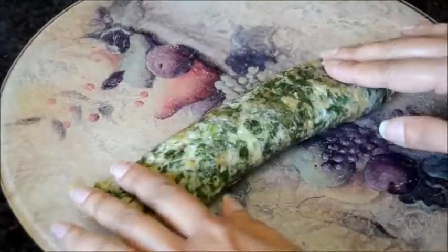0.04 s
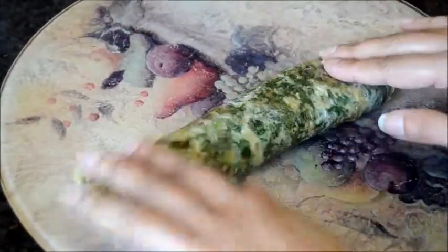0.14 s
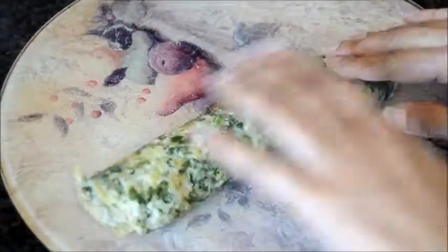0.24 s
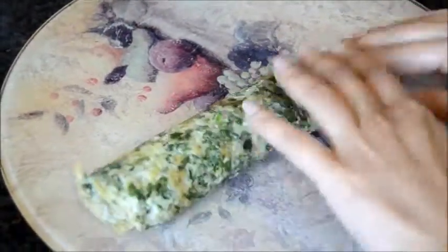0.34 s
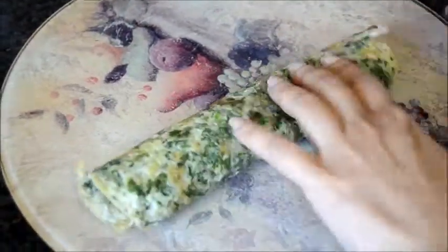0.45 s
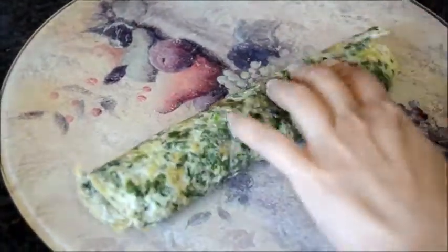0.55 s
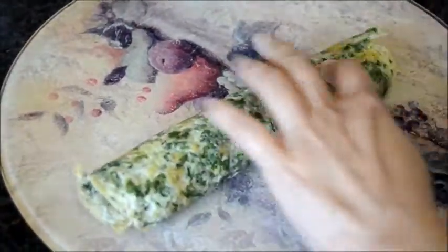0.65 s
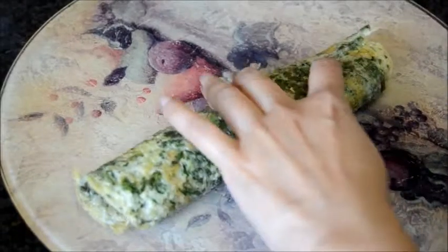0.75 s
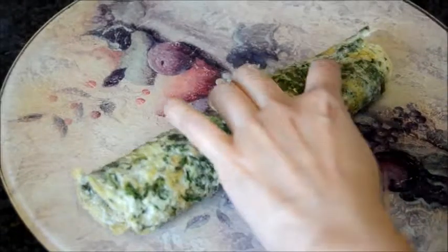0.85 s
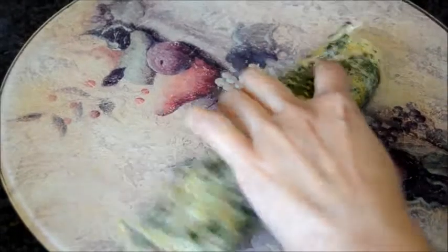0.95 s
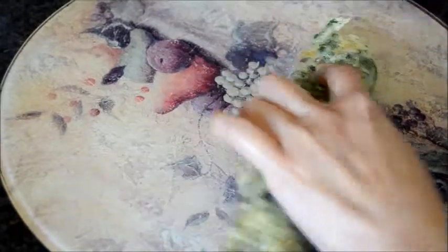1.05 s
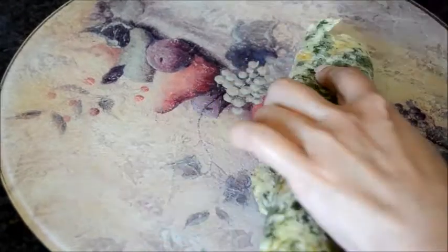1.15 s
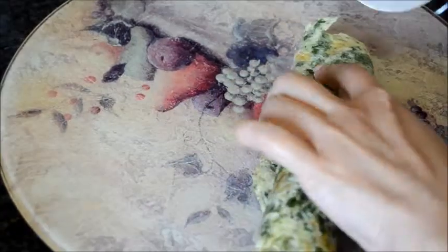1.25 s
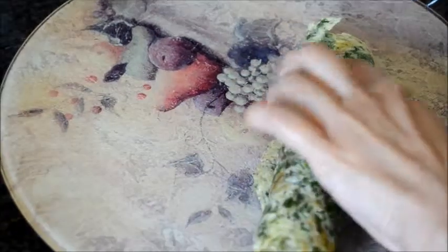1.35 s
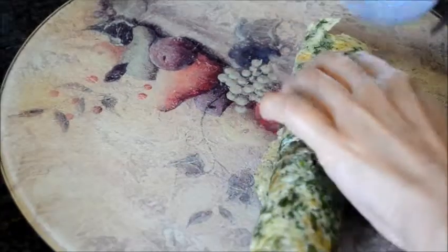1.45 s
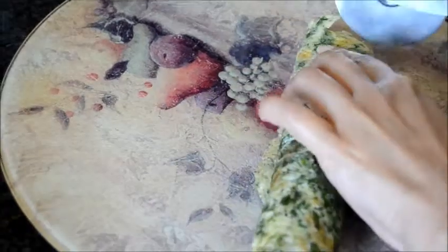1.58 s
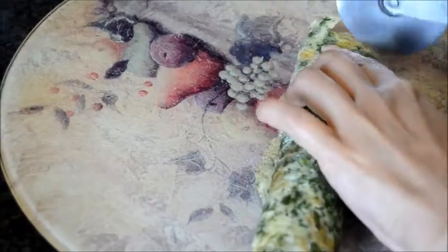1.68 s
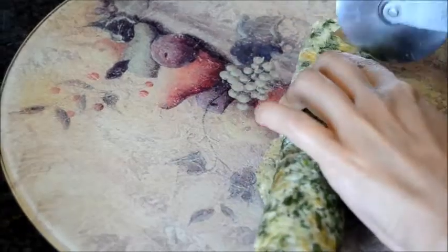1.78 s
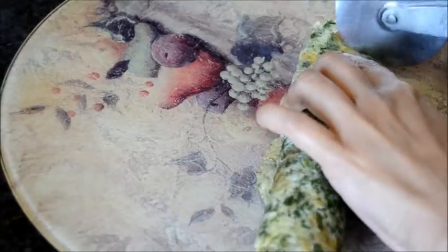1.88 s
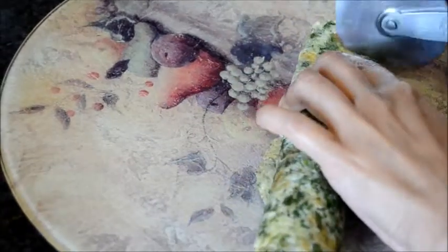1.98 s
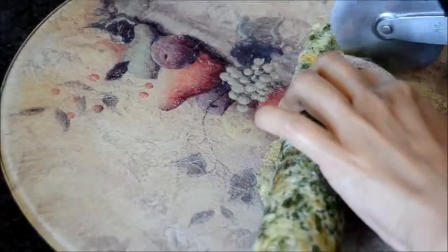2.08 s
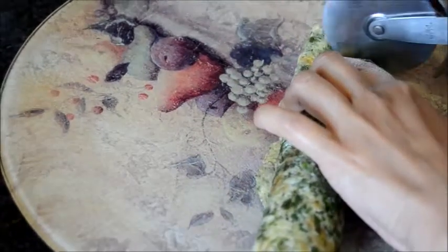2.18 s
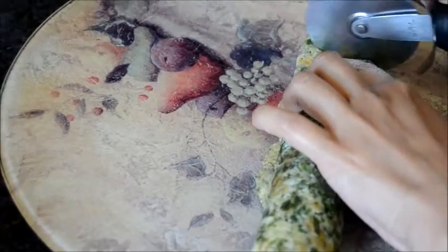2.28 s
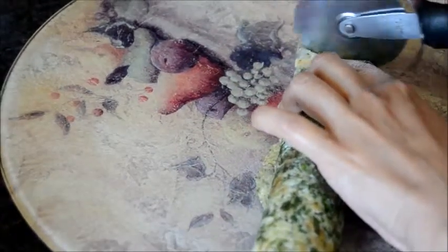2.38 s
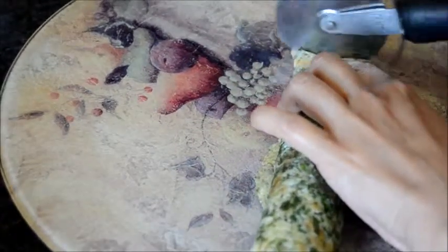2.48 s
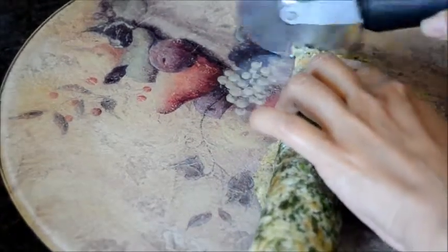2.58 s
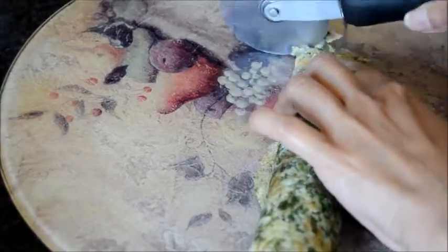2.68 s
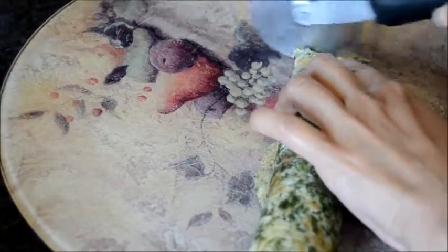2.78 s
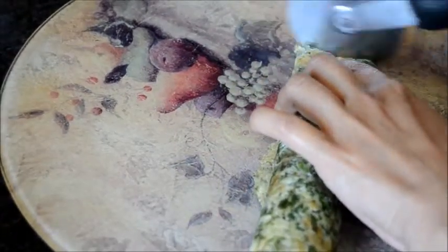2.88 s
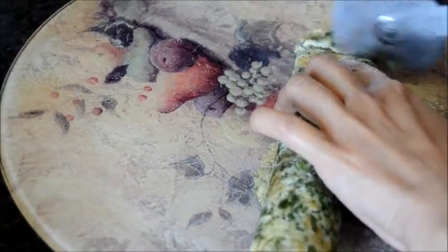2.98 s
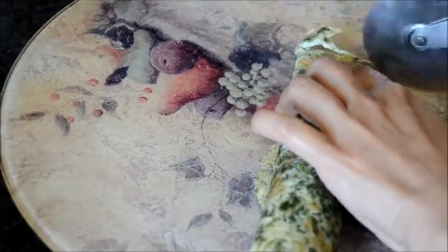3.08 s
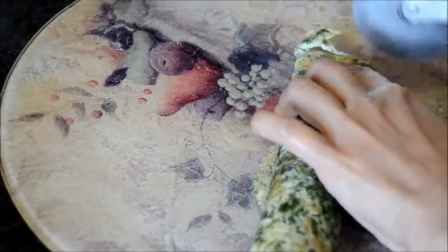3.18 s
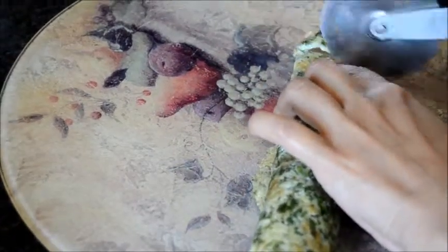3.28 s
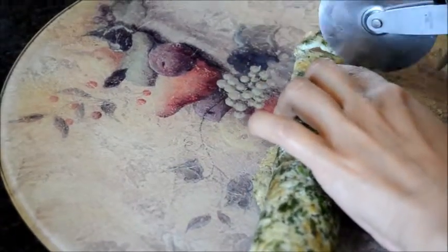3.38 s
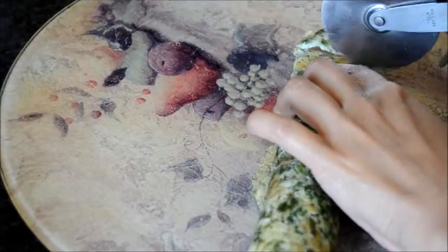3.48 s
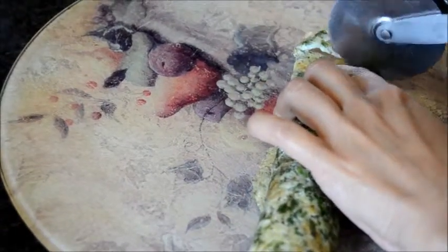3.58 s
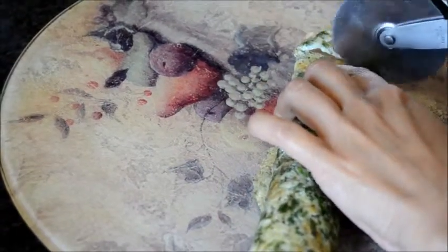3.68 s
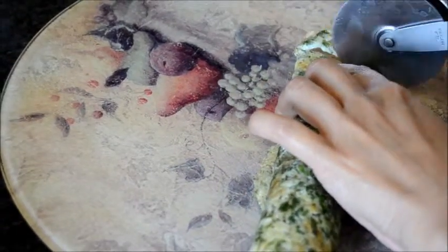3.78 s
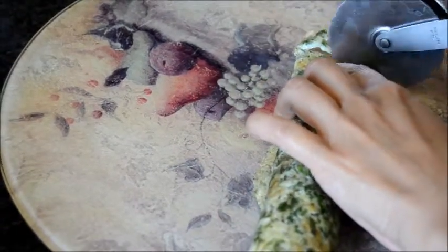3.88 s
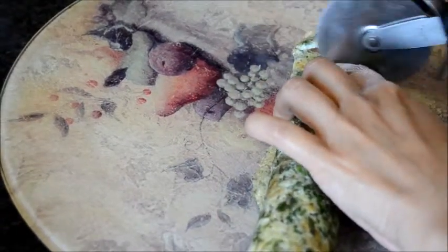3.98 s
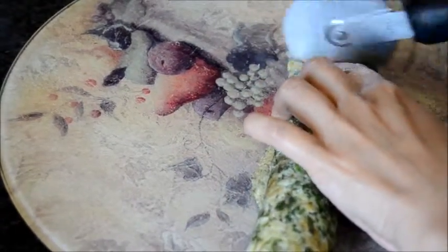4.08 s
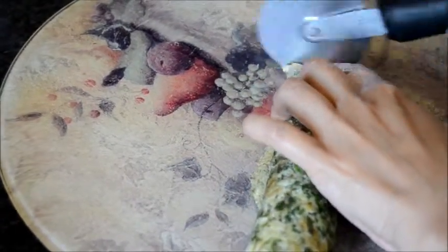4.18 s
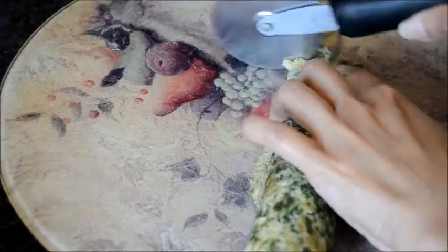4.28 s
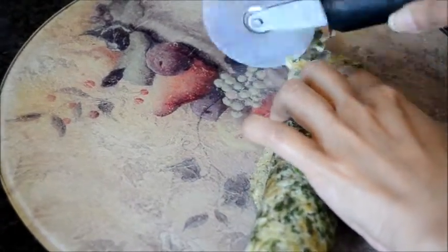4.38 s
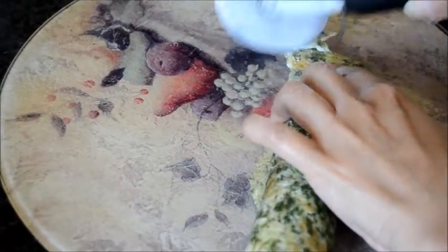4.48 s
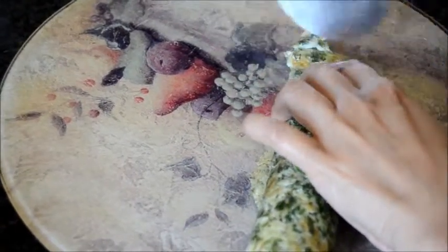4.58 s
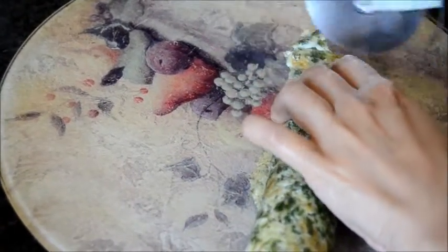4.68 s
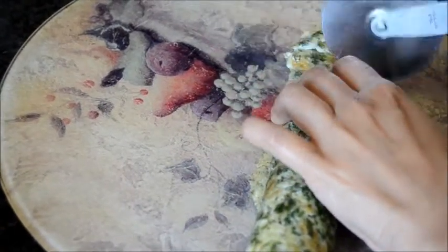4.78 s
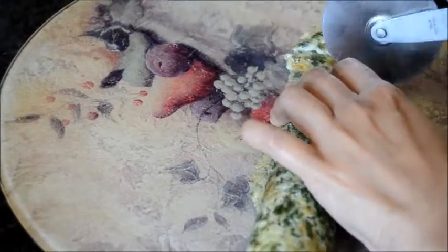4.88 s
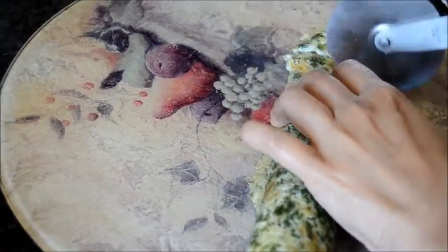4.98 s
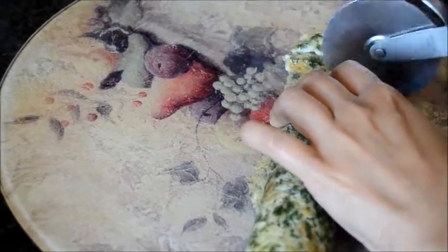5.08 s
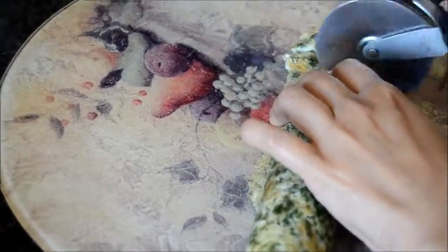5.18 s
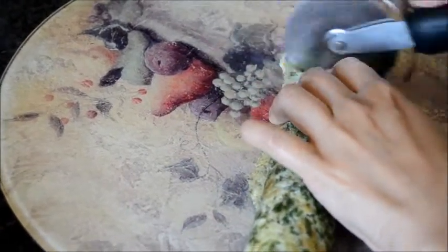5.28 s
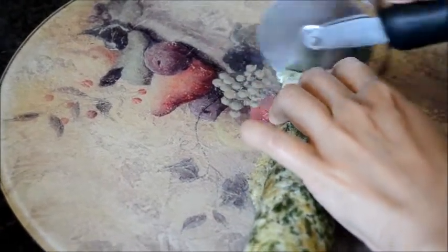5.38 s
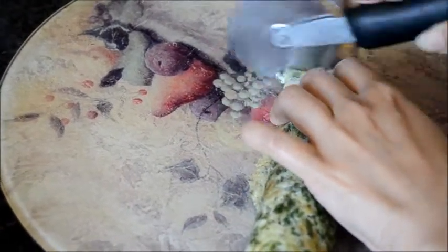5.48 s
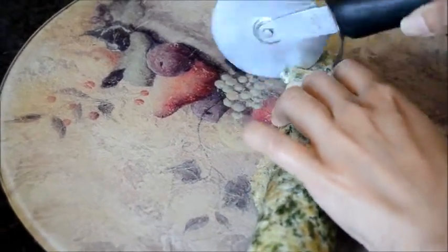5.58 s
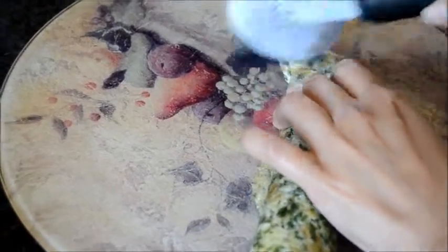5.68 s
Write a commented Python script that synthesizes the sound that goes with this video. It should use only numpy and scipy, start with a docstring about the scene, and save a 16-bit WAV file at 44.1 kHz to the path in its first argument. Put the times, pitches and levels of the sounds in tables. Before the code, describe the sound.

Moist egg crackles faintly, a metal pizza cutter clatters as it is picked up, then three strokes scrape and knock on a hard board.

```python
"""Moist egg crackles softly over a low steady hum of air, then a steel pizza wheel is picked up with a clatter.
It is pushed three times through a rolled omelette: bursts of tiny slips and single blows ring the hard board.
The free wheel rings in slowly beating pairs of partials, and the egg is random fizz with small smacks.
A small, bright kitchen, a dense decaying tail, answers all but the wheel's ring and the hum.
The board is close to the microphone, the pickup further off."""
import sys
import numpy as np
from scipy import signal
from scipy.fft import rfft, irfft, next_fast_len
from scipy.io import wavfile
from scipy.ndimage import uniform_filter1d

SR = 44100
rng = np.random.default_rng(int(sys.argv[2]) if len(sys.argv) > 2 else 0)


def master(y):
    """Save y as 16-bit WAV."""
    cut = np.clip(np.atleast_2d(y).T, -1, 1)
    pcm = np.round(cut * 32767)  # scale
    wavfile.write(sys.argv[1], SR, pcm.astype(np.int16))


N = 253479  # length in samples

# Small things radiate little bass. Each row: frequency in Hz, gain in dB.
RADIATION = [(30, -29.5), (100, -15.5), (240, -2.5)]


def grinding(ring_db=1.5, rasp_db=-3.5, clack_db=-2, damped_share=0.19, gain_db=-3, shift_db=6,
             bump_db=-9, spots=4):
    """The rim crushes its way over the board's texture: dense slips and a few bumps keep its modes ringing."""
    # Pushes of the wheel along the board. Each row: start in seconds, end in seconds,
    # relative force at the end in dB, swell up to it in dB (negative sags).
    pushes = [(2.383, 2.577, -53, 2), (2.599, 2.664, -39.5, 7), (2.843, 2.999, -31.5, 5),
              (3.027, 3.077, -39.5, 0), (3.995, 4.181, -54, 4), (4.2, 4.287, -45, -2.5),
              (5.18, 5.178, -46.5, -1), (5.29, 5.542, -45.5, 4.5)]
    # Colour of the rasp at the rim. Each row: frequency in Hz, gain in dB.
    rasp_colour = [(59, -71), (100, -29), (273, -18), (635, -10.5), (941, -3), (1040, -10.5), (1340, 6),
                   (1630, -13.5), (2190, 1.5), (3520, -12.5), (5110, -12), (5640, -23), (6340, -13.5),
                   (8690, -37.5), (11000, -52), (14300, -90), (22000, -120)]
    t = np.arange(SR // 3) / SR
    force = np.zeros(N)
    for start, end, db, swell_db in pushes:
        force += undb(db) * gesture(start, end, attack_s=0.016, release_s=0.026, swell_db=swell_db)
    slips = grains(rate=1150, spread_db=3.0)
    bumps = undb(bump_db) * grains(rate=70, spread_db=1.0)
    excitation = (slips + bumps) * force

    # the contact travels over spots that each ring the board a little differently
    shares = np.array([undb(shift_db * walk(rate=40)) for _ in range(spots)])
    shares /= np.linalg.norm(shares, axis=0)
    rasp = undb(rasp_db) * energy_one(colour(signal.unit_impulse(len(t)), rasp_colour))
    middle = board_at(0)
    out = np.zeros(N)
    for share in shares:
        clack = undb(clack_db) * ring(middle * [1, 1, damped_share], t, scatter_db=7.0)
        body = rasp + clack + undb(ring_db) * ring(middle, t, scatter_db=3.0)
        out += signal.fftconvolve(excitation * share, body)[:N]
    return undb(gain_db) * colour(out, RADIATION)


def knocks():
    """The rim drops into dents and bangs down as it leaves the omelette, each blow ringing the board."""
    # Each row: time in seconds, peak of the direct sound in dB, treble slope in dB per octave,
    # place on the board from 0 (middle) to 1 (edge).
    blows = [(2.552, -37, -7, 0.23), (2.582, -33, -0.5, 0.39), (2.593, -36, -3, 0.14),
             (2.629, -27.5, -0.4, 0.28), (2.690, -31.5, 0.5, 0.23), (2.778, -40.5, 1, .2),
             (2.803, -37, -0.5, 0.23), (2.813, -32, 0, 0.27), (2.827, -34, -0.5, 0.24),
             (2.846, -28.5, 2, 0.33), (2.873, -27, 0.5, 0.17), (2.8799, -27, 2, .22), (2.901, -27, 0.5, .1),
             (2.987, -31, 5, .1), (3.037, -28, -0.5, 0.083), (3.051, -29.5, 1.5, .1),
             (3.164, -30.5, -2, 0.38), (3.1671, -22.5, -3.5, 0.42), (4.068, -45.5, -0.5, .3),
             (4.155, -42, 0, 0.24), (4.174, -43, -4, .3), (4.252, -41, -8, .3), (4.266, -38, -5, .4),
             (4.293, -25.5, 4, .74), (4.2973, -14.5, 2.7, .83), (4.308, -19.5, 1.5, 0.9),
             (4.326, -27, 4.5, 0.76), (4.347, -33, 3, .95), (4.476, -37.5, -0.3, 1),
             (5.176, -50.5, -4.5, 0.35), (5.285, -40.5, -4, 0.17), (5.448, -38.5, -7, 0.41),
             (5.529, -42, -9, .23), (5.561, -37.5, -2.5, 0.56), (5.582, -40.5, 3.5, 1), (5.586, -35, -6, 1),
             (5.67, -51, -9, .3), (5.68, -40, -6, .25)]
    # Colour of the snap. Each row: frequency in Hz, gain in dB.
    snap_colour = [(30, -27), (120, -41.5), (300, -30), (600, -19.5), (1000, -5), (1400, 4.5), (2200, 5.5),
                   (3200, -5.5), (4300, -3), (5700, -26.5), (6800, -17), (7800, -25), (8600, -23),
                   (11000, -64.5)]
    out = np.zeros(N)
    for s, db, slope_db, place in blows:
        knock = blow(snap_colour, board_at(place), slope_db, ring_db=-1, crack_t60=0.016, chatter_db=5.5)
        add(out, s, knock, db)
    return out


def omelette(patchy_db=3.5, board_db=-3, snap_db=-9, resting_db=-75.5):
    """Moist egg fizzes in fits under pressure and lets go with small smacks."""
    # Egg squeezed by fingers or blade. Each row: start in seconds, end in seconds,
    # fizz level in dB before the loss of bass.
    squeezes = [(0.027, 0.193, -68), (0.425, 0.454, -69), (.56, .68, -68), (0.746, 1.108, -59.5),
                (1.255, 1.945, -65.5), (2.04, 2.157, -70), (2.297, 2.568, -62), (3.69, 3.913, -73.5),
                (4.012, 4.302, -58.5), (4.756, 4.788, -64.5), (4.977, 5.112, -64.5), (5.138, 5.592, -60.5)]
    # Egg sticking and letting go. Each row: time in seconds, peak in dB before the loss of bass,
    # centre frequency in Hz, t60 of the noise in seconds.
    smacks = [(.408, -57, 8500, 0.15), (1.2543, -47.5, 3520, 0.062), (1.293, -52, 4140, 0.06),
              (1.358, -54.5, 4800, .05), (2.059, -57.5, 8100, .05), (2.14, -54, 3900, .056),
              (2.367, -45.5, 6000, 0.31), (3.396, -59.5, 8000, .042), (3.629, -46, 4040, 0.08),
              (4.753, -53.5, 5000, .25), (5.357, -42, 4930, 0.096)]
    # Colour of the moist egg. Each row: frequency in Hz, gain in dB.
    egg_colour = [(300, 3.5), (1500, 3.5), (3000, -3.5), (4500, 1.5), (6400, 1), (7800, -6), (9000, 0.5),
                  (11000, -16.5)]
    fizz = grains(rate=1800, spread_db=2.5) * undb(patchy_db * walk(rate=40))
    pressure = np.full(N, undb(resting_db))  # egg under the resting hand
    for start, end, db in squeezes:
        pressure += undb(db) * gesture(start, end, attack_s=0.023, release_s=0.04)
    out = unit(colour(fizz, egg_colour)) * pressure

    t = np.arange(SR // 5) / SR
    # only a firm squeeze reaches through to the board
    firm = out * pressure / pressure.max()
    out += undb(board_db) * signal.fftconvolve(firm, ring(board_at(0), t, scatter_db=3.0))[:N]
    for s, db, hz, t60 in smacks:
        smack = energy_one(rng.standard_normal(len(t)) * fade(t, t60))
        smack += undb(snap_db) * signal.unit_impulse(len(t))
        add(out, s, band(colour(smack, egg_colour), hz, skirt_db=-19.5), db)
    return colour(out, RADIATION)


def pickup():
    """Loose steel parts, wheel, fork and guard, clash as the cutter is taken up."""
    # Each row: time in seconds, peak of the direct sound in dB, treble slope in dB per octave,
    # free ring against the snap in dB.
    clashes = [(.814, -49.5, 0.5, -26), (.824, -50, -17, -19), (.8665, -33, -1.5, -6),
               (.8745, -29.5, 1.5, -4.5), (.878, -30.5, -0.5, 0), (.886, -36, -0.5, -10),
               (.92, -37.5, 0, -4)]
    # Colour of the snap. Each row: frequency in Hz, gain in dB.
    snap_colour = [(88, -51), (150, -26), (292, -18), (449, -24), (770, -5), (1300, -12), (1860, 0.5),
                   (2300, -9), (3300, -2.5), (4990, -2), (5560, -10), (6300, 0), (7680, -9.5), (9030, 0.5),
                   (11000, -29), (14300, -59), (22000, -120)]
    # Modes of fork and guard. Each row: frequency in Hz, relative level in dB, t60 in seconds.
    fork = [(2066, -8, 0.078), (2700, -8, 0.072), (2810, -3.5, .1), (3290, -5, 0.099), (4480, -6, 0.16),
            (4790, -4, 0.097), (5179, -5, 0.33), (6200, -9, 0.2), (6380, -4.5, 0.16), (7110, -3, 0.45),
            (9000, -24, 0.23), (9400, -15, 0.071), (9200, 3.5, 0.21)]
    out = np.zeros(N)
    for s, db, slope_db, ring_db in clashes:
        clash = blow(snap_colour, fork, slope_db, ring_db, crack_t60=0.068, chatter_db=11)
        add(out, s, clash, db)
    return out


def wheel(twin_db=-6):
    """Clear of the board the thin disc sings on until it is damped; its modes come in beating pairs."""
    # Modes of the free disc. Each row: frequency in Hz, relative level in dB, t60 in seconds, beat in Hz.
    disc = [(2416, -2, 2, 2.2), (3875, -11, 2.6, 3), (5575, -11, 2.6, 3.4), (6985, -1, 1.05, 4.6),
            (7546, -3, 2.6, 1.9), (9215, 1, 1.1, 3.1), (9766, -3, 1.45, 4.2)]
    # The wheel is set free. Each row: time in seconds, peak in dB, seconds until it is silenced.
    lifts = [(.877, -51.5, 1.5), (3.166, -68.5, .42), (5.681, -64, .3)]
    out = np.zeros(N)
    t = np.arange(2 * SR) / SR
    pairs = []
    for hz, db, t60, beat in disc:
        pairs += [(hz, db, t60), (hz + beat, db + twin_db, t60)]
    for s, db, length in lifts:
        damping = np.clip((length - t) / .1, 0, 1)  # falls to nothing over the last 0.1 s
        add(out, s, ring(pairs, t, scatter_db=1) * damping, db)
    return out


def nudges():
    """Things nudged along the board: brief soft rubs, each noise in one broad band."""
    # Each row: middle in seconds, peak of the direct sound in dB, half length (to 1/e) in seconds,
    # centre frequency in Hz.
    rubs = [(0.767, -57, 0.017, 1640), (0.826, -45, 0.015, 3520), (0.843, -54, 0.04, 324),
            (1.791, -60.5, 0.038, 1580), (1.939, -61.5, 0.017, 2150), (2.298, -58, .012, 2170),
            (3.784, -59, 0.034, 1470), (4.789, -58, 0.049, 1340)]
    out = np.zeros(N)
    t = np.arange(-SR // 8, SR // 8) / SR
    for s, db, half, hz in rubs:
        rub = band(rng.standard_normal(len(t)), hz, skirt_db=-43.0) * np.exp(-(t / half) ** 2)
        add(out, s + t[0], rub, db)
    return out


def kitchen(x, wet_db, gap_s=0.0023, build_s=0.0027):
    """Direct sound plus a dense tail off counter and walls, shorter in the treble."""
    # Each row: frequency in Hz, t60 in seconds.
    decay = [(200, 0.56), (1000, 0.41), (3000, 0.38), (9000, 0.34)]
    t = np.arange(SR * 2 // 3) / SR
    noise = rfft(rng.standard_normal(len(t)))
    hz = np.fft.rfftfreq(len(t), 1 / SR)
    centres, t60s = np.transpose(decay)
    tail = np.zeros(len(t))
    for weights, t60 in zip(np.eye(len(t60s)), t60s):
        # overlapping bands that add up to the whole noise
        tail += irfft(noise * np.interp(hz, centres, weights), len(t)) * fade(t, t60)
    tail = energy_one(tail * np.clip((t - gap_s) / build_s, 0, 1))
    return x + undb(wet_db) * signal.fftconvolve(x, tail)[:N]


def air(air_db=-63, drone_hz=183, drone_width_hz=22, drone_db=-73):
    """Steady room noise with one low resonance, both levels rms."""
    # Colour of the room noise. Each row: frequency in Hz, gain in dB.
    air_colour = [(15, -57), (25, -11), (128, -10.5), (187, -0.5), (336, -3.5), (518, 0), (603, -3.5),
                  (979, -3.5), (1260, -7.5), (1510, -8), (3080, -14.5), (6280, -19.5), (7900, -26),
                  (8970, -24), (11000, -36), (14300, -66), (22000, -120)]
    resonance = signal.iirpeak(drone_hz, drone_hz / drone_width_hz, fs=SR)
    drone = signal.lfilter(*resonance, rng.standard_normal(N))
    hiss = colour(rng.standard_normal(N), air_colour)
    return unit(hiss) * undb(air_db) + unit(drone) * undb(drone_db)


def blow(spectrum, modes, slope_db, ring_db, crack_t60, chatter_db, clack_db=0.0, damped_share=0.3):
    """One hard contact: a snap, a short chatter, and the modes of the struck thing."""
    t = np.arange(SR // 3) / SR
    contact = undb(chatter_db) * energy_one(rng.standard_normal(len(t)) * fade(t, crack_t60))
    contact[0] += 1
    # while the two parts still touch, the modes are heavily damped and give a broad clack
    damped = ring(np.array(modes) * [1, 1, damped_share], t, scatter_db=1.5)
    clack = signal.fftconvolve(contact, damped)[:len(t)]
    sound = energy_one(colour(contact, spectrum)) + undb(clack_db) * energy_one(clack)
    sound += undb(ring_db) * ring(modes, t, scatter_db=2)
    return colour(sound, RADIATION, slope_db)


def board_at(place):
    """Modes of the board with the cutter pressed on it, excited between its middle (0) and its edge (1)."""
    # Each row: frequency in Hz, relative level in dB touched in the middle,
    # relative level in dB touched at the edge, t60 in seconds.
    board_modes = [(791, -15.5, -6, 0.11), (948, -13, -5.5, 0.15), (1299, -9.5, 6, 0.097),
                   (1363, -3.5, -1.5, 0.2), (1407, -14, 2.5, 0.099), (1858, 2, -23, 0.11),
                   (1925, -9, 0.5, 0.07), (2168, 4, -8.5, 0.07), (2193, -2.5, -8, 0.068),
                   (2385, -1.5, -5, 0.05), (2514, -0.5, 3, 0.069), (2622, -3, -17, 0.14),
                   (2977, -8.5, -15, 0.069), (3184, -1, -11, 0.028), (3248, -2, -5, 0.062),
                   (3873, -6, -9, 0.055), (4110, -17, -4, 0.026), (4120, -5, -6.5, 0.067),
                   (4776, -14.5, -5, 0.044), (4987, -8.5, -25, 0.11), (5444, -32, -7.5, .06),
                   (5450, -21, -4.5, 0.039), (6130, -18, -17, 0.06), (6460, -19.5, -10, 0.05),
                   (6690, -22.5, -17, 0.03), (7700, -31, -33, 0.061), (8350, -28, -25, 0.095),
                   (8450, -26.5, -21, 0.11), (8940, -27, -36, 0.11), (10000, -40, -35, .08)]
    hz, middle_db, edge_db, t60 = np.transpose(board_modes)
    db = middle_db + np.clip(place, 0, 1) * (edge_db - middle_db)
    return np.transpose([hz, db, t60])


def ring(modes, t, scatter_db):
    """Decaying modes of (Hz, dB, t60); random shares and signs stand for the place of contact."""
    hz, db, t60 = np.transpose(modes)[:, :, None]
    share = undb(db + scatter_db * rng.standard_normal(hz.shape)) * rng.choice([-1, 1], hz.shape)
    share = share / np.sqrt(t60)  # a long mode gets no more energy than a short one
    return energy_one(np.sum(share * fade(t, t60) * np.sin(2 * np.pi * hz * t), axis=0))


def grains(rate, spread_db):
    """Random tiny impulses, rate a second on average, mostly small and a few large; rms one."""
    chance, sign = rng.random(N), rng.choice([-1, 1], N)
    sizes = undb(spread_db * np.minimum(rng.standard_exponential(N), 4))
    return unit((chance < rate / SR) * sign * sizes)


def walk(rate):
    """Smooth, bounded random drift with a spread near one, heading for a new value rate times a second."""
    hold = int(SR / rate)
    steps = np.repeat(rng.uniform(-2.04, 2.75, N // hold + 1), hold)[:N]
    return uniform_filter1d(steps, hold)


def gesture(start, end, attack_s, release_s, swell_db=0):
    """Gain of one move of the hand: attack, a hold that swells up (or sags) to one, release."""
    t = np.arange(N) / SR
    gate = np.interp(t, [start - attack_s, start, end, end + release_s], [0, 1, 1, 0])
    return gate * undb(np.interp(t, [start, end], [-swell_db, 0]))


def colour(x, points, slope_db=0):
    """Causal minimum-phase filter through (Hz, dB) points, tilted about 2 kHz."""
    size = 2 * next_fast_len(len(x))
    octave = np.log2(np.fft.rfftfreq(size, 1 / SR) + 1)
    hz, db = np.transpose(points)
    tilt = slope_db * np.clip(octave - np.log2(2000), -1, 2.5)  # octaves from 2 kHz, level beyond
    db = np.interp(octave, np.log2(hz), db) + tilt
    # folding the cepstrum onto positive times makes the response causal
    cepstrum = irfft(np.log(undb(db)))
    cepstrum[1:size // 2] *= 2
    cepstrum[size // 2 + 1:] = 0
    return irfft(rfft(x, size) * np.exp(rfft(cepstrum)))[:len(x)]


def band(x, hz, skirt_db):
    """One broad hump, skirt_db down two octaves away."""
    return colour(x, [(hz / 16, 2 * skirt_db), (hz / 4, skirt_db), (hz, 0), (hz * 4, skirt_db)])


def add(out, s, sound, db):
    """Mix a sound in at time s, the rms of its loudest 4 ms at the given level."""
    start = int(s * SR)
    peak = np.sqrt(uniform_filter1d(sound ** 2, size=176).max())
    out[start:start + len(sound)] += (sound * undb(db) / peak)[:N - start]


def fade(t, t60):
    """Exponential decay, 60 dB down at t60."""
    return np.exp(-np.log(1000) * t / t60)


def undb(db):
    """Decibels to gain."""
    return 10 ** (np.asarray(db) / 20)


def unit(x):
    """Scale to an rms of one."""
    return x / np.sqrt(np.mean(x ** 2))


def energy_one(x):
    """Scale a response so that it passes white noise at an unchanged level."""
    return x / np.linalg.norm(x)


def scene():
    """The board is close by; the cutter is picked up further off, so it carries more room."""
    near = kitchen(grinding() + knocks() + omelette() + nudges(), wet_db=-5)
    far = kitchen(pickup(), wet_db=-1.5)
    return (near + far + wheel() + air())[None]


def record(dry):
    """The camera's microphone cuts the top steeply above 11 kHz."""
    top_cut = signal.ellip(8, .2, 70, 11000, fs=SR, output="sos")  # 0.2 dB ripple, 70 dB stop
    return signal.sosfilt(top_cut, dry)


dry = scene()
out = record(dry)
master(out)
```